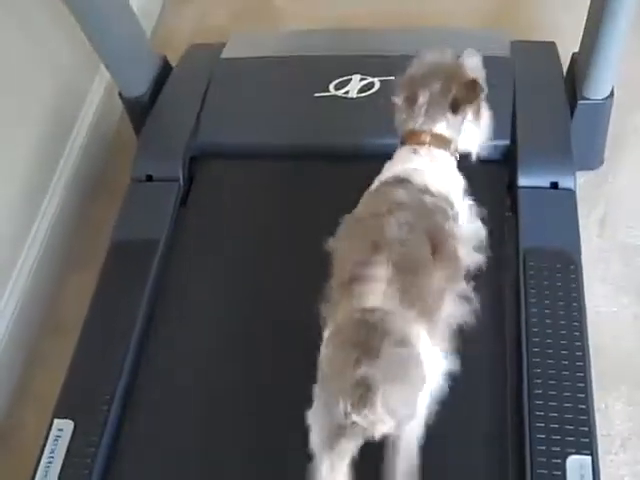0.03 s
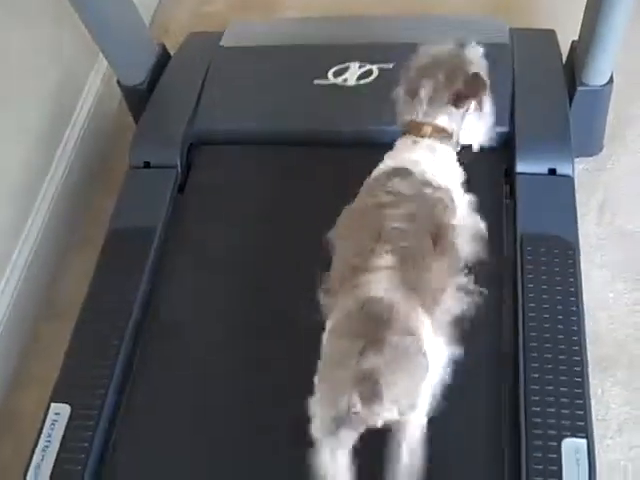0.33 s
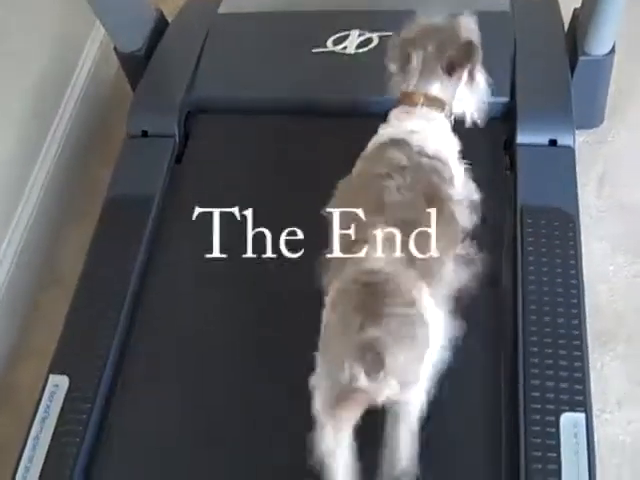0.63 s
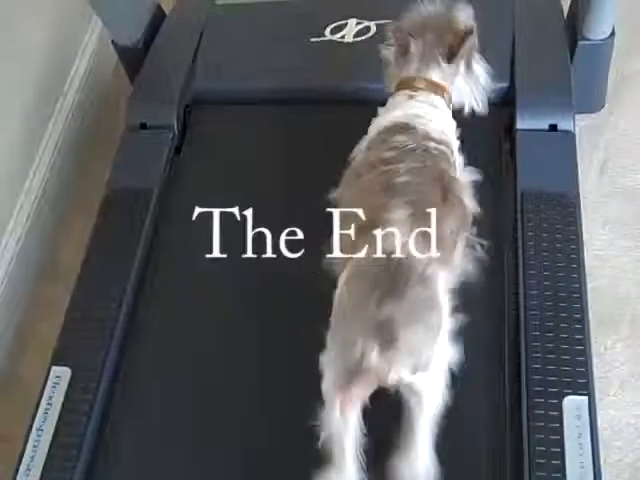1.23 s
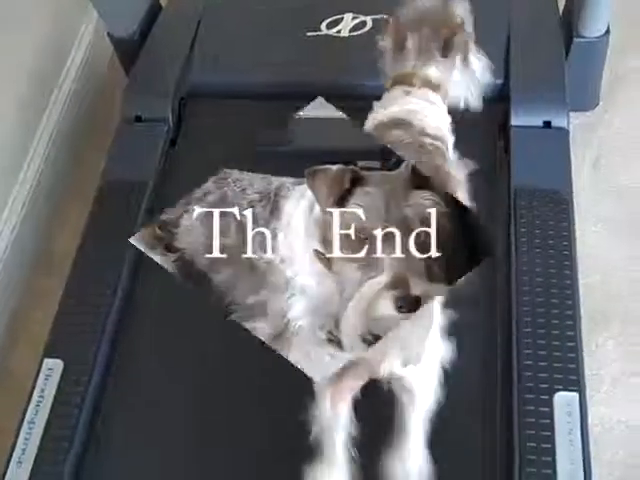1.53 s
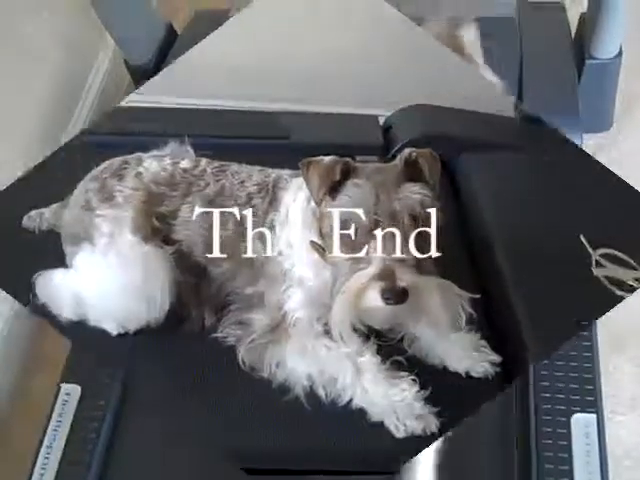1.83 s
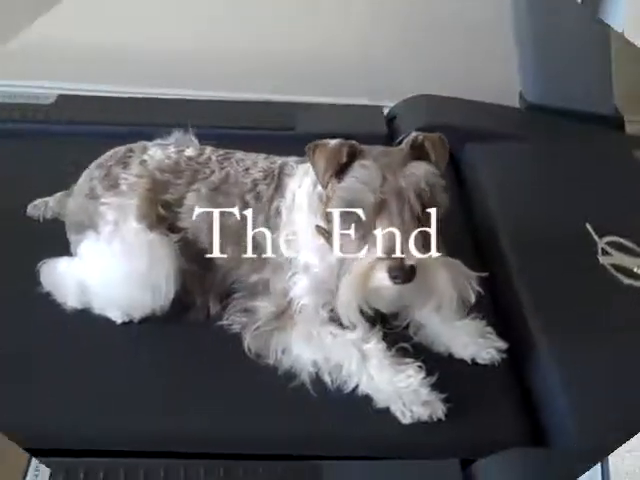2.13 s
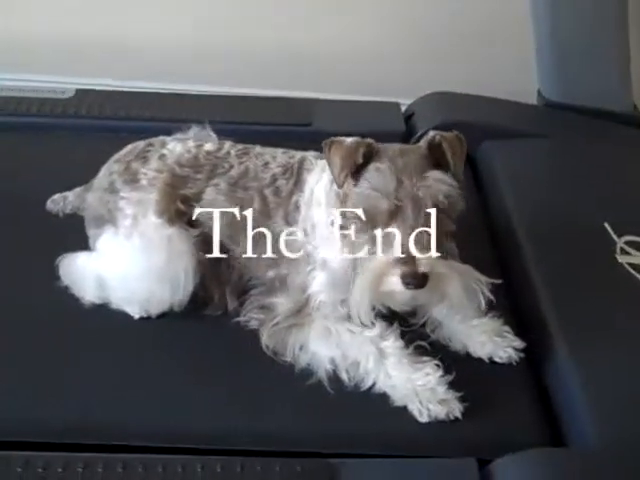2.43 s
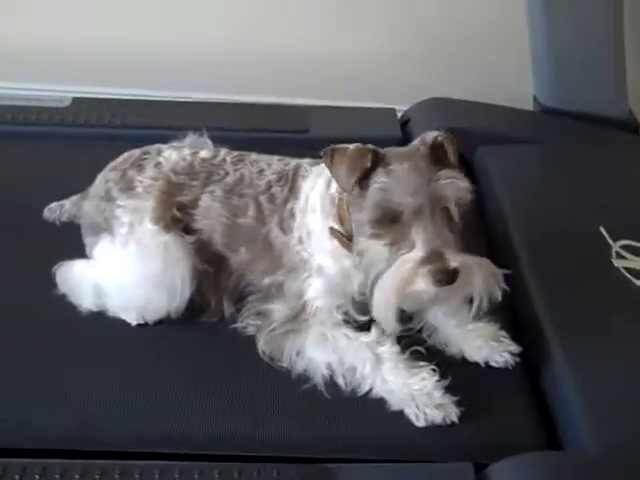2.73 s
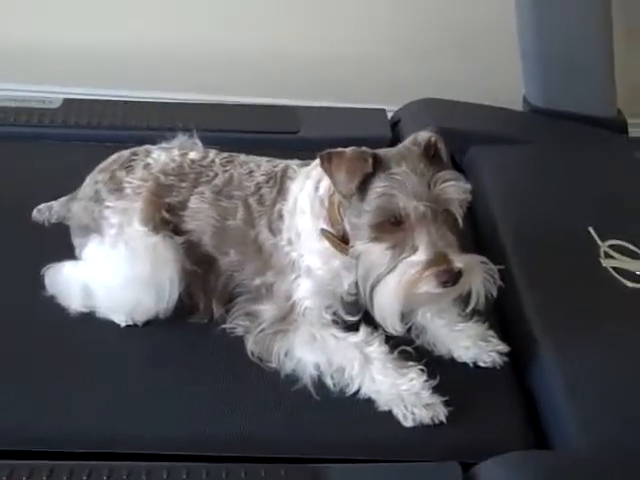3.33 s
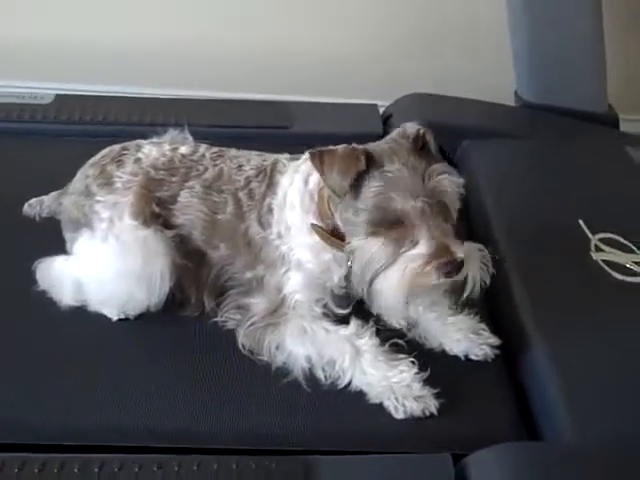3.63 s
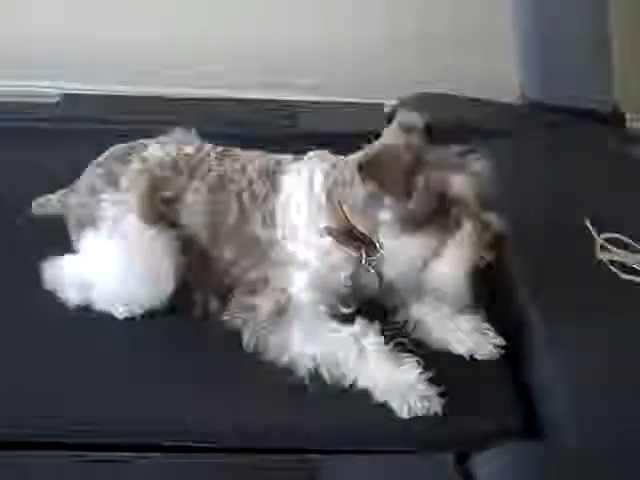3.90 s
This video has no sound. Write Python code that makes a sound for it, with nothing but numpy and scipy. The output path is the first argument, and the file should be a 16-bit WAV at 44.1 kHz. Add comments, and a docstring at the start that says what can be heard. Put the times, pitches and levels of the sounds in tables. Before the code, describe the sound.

A small dog trots on a running treadmill, claws clicking and tags jingling, then quiet.

```python
"""A small dog trots on a running treadmill, close to the microphone in a small room.
Its claws clack on the deck (the hollow board under the belt), its pads scuff the belt, and two
metal collar tags knock and ring. Behind the dog, the motor hums and the belt rumbles.
The scene then cuts to a quiet room with a faint high whine and one soft tap,
where the resting dog stirs and a tag ticks once."""
import sys
import numpy as np
from scipy import signal
from scipy.fft import rfft, irfft
from scipy.io import wavfile
from scipy.ndimage import uniform_filter1d

SR = 44100
rng = np.random.default_rng(int(sys.argv[2]) if len(sys.argv) > 2 else 0)


def waveform_to_disk(signal):
    """Save audio, clipped to [-1, 1], as 16-bit WAV at the path in sys.argv[1]."""
    frames = np.transpose(np.atleast_2d(signal))
    scaled = np.clip(frames, -1, 1) * 32767
    samples = np.round(scaled).astype(np.int16)
    wavfile.write(sys.argv[1], SR, samples)


N = 176400

# How alike left and right sound (1 the same, 0 unrelated, -1 opposite): pitch_hz, likeness
LIKENESS = [(600, .96), (1500, .84), (3500, .64), (5200, .3), (7800, -.3), (12000, 0)]
QUIET_LIKENESS = [(100, 0.8), (370, 0.2), (1200, 0)]
# How much louder the left side is than the right: pitch_hz, left_minus_right_db
MIC_BALANCE = [(30, -6.5), (60, -4), (200, -2.5), (1200, -1), (4000, -1.5), (5400, -3), (6400, -7),
               (7000, 0), (7700, 11.5), (9200, 12), (14000, 7)]
QUIET_BALANCE = [(110, -5), (370, 8), (1100, 6.5), (3800, .5), (7700, 2.5), (14000, -2)]
# Tone of the quiet room's air, the soft tap and the moving belt: pitch_hz, level_db
AIR_TONE = [(15, -14.5), (35, -3.5), (75, -0.5), (130, -3), (175, -6.5), (240, -2.5), (300, -9), (420, -9),
            (750, -13), (2000, -18), (7500, -23), (14000, -28)]
TAP_TONE = [(400, -20), (1000, 0), (2000, -16.5), (6000, -35)]
BELT_TONE = [(25, -21), (55, -6), (95, -13.5), (125, 0.5), (160, 1), (210, -3.5), (260, -3.5), (370, -14),
             (650, -12), (900, -11.5), (1250, -16), (1700, -16.5), (3400, -13.5), (5000, -10), (6600, -8.5),
             (8600, -10.5), (10000, -21), (14000, -32)]
# Steady notes of the quiet room and of the motor: pitch_hz, level_db
QUIET_NOTES = [(119, -68.5), (241, -73.5), (7865, -77.5)]
MOTOR_NOTES = [(185.6, -36.5), (592, -55.5), (786.5, -46), (1394, -53), (1574, -53.5), (1992, -54),
               (3398, -48.5)]
# Loudness over time of the belt and of the collar's chatter: time_s, level_db
BELT_LEVEL = [(0, -30), (.6, -28), (1.35, -29), (2.05, -32), (2.3, -28.5)]
CHATTER_LEVEL = [(0, -35.5), (.2, -33), (.6, -29), (1.9, -32.5), (2.3, -30)]
# Notes each tag rings at (fade_s is the time to drop 60 dB): pitch_hz, level_db, fade_s
FIRST_TAG = [(9218, -.7, .18), (9165, -12, .1), (9285, -14, .08), (11321, -20, .26), (5087, -20, .4)]
SECOND_TAG = [(10787, -1, .14), (11321, -12, .16), (4527, -3, .15)]
# Pitches at which the collar's ring and buckle sound strongly: pitch_hz, width_hz, level_db
BUCKLE_PEAKS = [(7324, 70, -6), (7920, 110, 1), (8425, 70, -2), (4527, 40, -4), (5087, 30, -5),
                (9216, 70, -5), (10787, 60, -16), (11321, 50, -22)]
# Tone of the tags rattling on their ring: pitch_hz, level_db
RATTLE_TONE = [(1000, -30), (4000, -13.5), (4700, -4.5), (6500, -5.5), (7800, 1.5), (9100, -7),
               (10000, -20.5), (14000, -22)]
# Each shake of the collar: start_s, rise_s, first_tag_db, second_tag_db, rattle_db
JINGLES = [(0.012, 0.0058, -16, -51, -59), (.040, 0.014, -20.5, -42, -49), (0.117, 0.0018, -36.5, -50, -23),
           (.220, 0.0028, -16, -36.5, -30.5), (.244, 0.0038, -20.5, -45.5, -31),
           (.640, 0.019, -21, -34, -25), (.811, 0.0027, -19, -17, -14.5), (.842, 0.0059, -16, -48, -40),
           (.937, 0.0053, -22.5, -48.5, -30), (.998, 0.0071, -22.5, -35, -19),
           (1.099, 0.0015, -21.5, -27, -16), (1.387, 0.0083, -21, -17, -14),
           (1.455, .008, -16.5, -58, -42.5), (1.527, 0.0097, -16.5, -46, -22),
           (1.553, 0.012, -24, -22.5, -24.5), (1.645, 0.019, -14.5, -44, -39),
           (1.676, 0.0032, -16, -42, -20.5), (1.801, .006, -27.5, -36, -17.5),
           (1.826, 0.035, -37.5, -30.5, -46), (1.979, 0.001, -13.5, -27.5, -14.5),
           (2.099, 0.017, -15.5, -33.5, -22), (2.268, 0.0018, -29, -40, -15)]
# Tone of a claw's clack, a pad's scuff and the deck's thud: pitch_hz, level_db
CLAW_TONE = [(100, -24), (400, -19.5), (800, -11), (1300, -7.5), (1850, -1.5), (2700, -4.5), (3400, 0.5),
             (4800, -3), (6500, 2), (8000, -5), (9500, -19), (14000, -31)]
SCUFF_TONE = [(100, -15.5), (500, -18.5), (900, -0.5), (1400, -1.5), (2200, 1.5), (3500, -1.5), (5000, -3),
              (7800, 1.5), (9800, -23.5), (14000, -27.5)]
THUD_TONE = [(60, -22), (150, 4), (300, -10.5), (700, -23.5), (2000, -42.5)]
# Claws catching the belt: start_s, level_db
CLAW_TICKS = [(0.349, -15.5), (0.4107, -15), (0.6452, -12.5), (.997, -13), (1.003, -15), (1.232, -14),
              (1.520, -15.5), (1.57, -19.5), (1.815, -16), (2.103, -14), (2.162, -20)]
# Each paw landing: start_s, claw_db, pad_db, brightness_db_per_octave, knock_pitch_hz
STEPS = [(.056, -18.5, -24, -2, 2217), (.160, -9, -20.5, 0.5, 3930), (.255, -13, -19.5, 0, 3440),
         (0.355, -16.5, -17, 1, 4120), (.449, -9.5, -16.5, 1.5, 2000), (.548, -9.5, -21, -1, 3402),
         (.653, -16, -16.5, 1.5, 3140), (0.7415, -8.5, -19.5, 1.5, 3310), (.8328, -14, -23, 0, 3260),
         (.931, -21.5, -18.5, -5.5, 1900), (1.030, -8.5, -26.5, 0, 1860), (1.1205, -10.5, -23, 0.5, 3340),
         (1.22, -17.5, -18.5, -2, 3430), (1.3156, -6.5, -18, 0, 2000), (1.407, -14, -24, -1.5, 3600),
         (1.505, -21.5, -19.5, -3, 4198), (1.6044, -9, -21.5, 0.5, 2000), (1.700, -13, -23, 0, 3300),
         (1.803, -21, -16.5, 0.5, 2411), (1.9008, -8.5, -17.5, 1.5, 2180), (1.995, -19, -29, -1.5, 3400),
         (2.094, -18, -26.5, -2, 2320), (2.1934, -11.5, -20.5, 1.5, 3200), (2.286, -14, -21.5, 5, 3600)]

CUT_S, CUT_FADE_S = 2.304, 0.0096
ECHO_DELAY_S, ECHO_FADE_S, ECHO_DB = 0.0025, 0.26, -7.5
TAG_ROUGHNESS, TAG_TOUCHES_PER_S = 0.589, 170
COLLAR_DB, CHATTER_FLUTTER_DB = 0.66, 2.6
CLAW_GAP_S, CLAW_DECAY_S, CLAW_SCATTER_DB = 0.0012, 0.0007, 1.5
KNOCK_DB, KNOCK_DECAY_S = -16, 0.0011
THUD_DB, THUD_DB_PER_CLAW_DB = -29, 0.68


def amp(db):
    """Turn decibels into a number to multiply by."""
    return 10 ** (np.asarray(db) / 20)


def unit(x):
    """Scale a signal to an average power of 1."""
    return x / np.sqrt(np.mean(x ** 2))


def curve(points):
    """Read a table's value at every pitch in the sound."""
    hz, value = np.array(points, float).T
    return np.interp(np.log(np.fft.rfftfreq(N, 1 / SR) + 1e-9), np.log(hz), value)


def colour(x, tone):
    """Give a sound the tone in a table; plain noise keeps its power."""
    return irfft(rfft(x) * unit(amp(curve(tone))), N)


def spread(pair, likeness=LIKENESS):
    """Turn two signals into left and right, alike in the bass."""
    alike = np.clip(curve(likeness), -1, 1)
    shared, different = rfft(pair) * np.sqrt([(1 + alike) / 2, (1 - alike) / 2])
    return irfft(np.array([shared + different, shared - different]), N)


def lean(x, balance):
    """Left and right pick up each pitch with different strength."""
    half_db = curve(balance) / 2
    return irfft(rfft(x) * amp([half_db, -half_db]), N)


def wander(per_s):
    """A smooth random wobble, about 1 in size."""
    hold = max(int(SR / per_s), 1)
    stairs = np.repeat(rng.standard_normal(N // hold + 1), hold)
    return unit(uniform_filter1d(uniform_filter1d(stairs, hold), hold)[:N])


def noise():
    """Two unrelated, even hisses (white noise)."""
    return rng.standard_normal((2, N))


def add(out, start_s, sound):
    """Mix a sound in at a given time."""
    i = max(int(start_s * SR), 0)
    out[..., i:i + sound.shape[-1]] += sound[..., :max(N - i, 0)]


def strike(rise_s, decay_s):
    """The loudness of a hit: it climbs steadily, then dies away."""
    t = np.arange(SR // 4) / SR
    return np.minimum(t / rise_s, 1) * np.exp(-np.maximum(t - rise_s, 0) / decay_s)


def swell(levels):
    """Turn a table of times and levels into a volume curve."""
    return amp(np.interp(np.arange(N) / SR, *np.array(levels).T))


def hum(notes, drift, flutter_db):
    """Steady notes that waver a little in pitch and loudness."""
    clock = np.cumsum(1 + drift * wander(11)) / SR
    out = 0
    for hz, db in notes:
        level = amp(db + flutter_db * wander(20)) * np.sqrt(2)
        out += level * np.sin(2 * np.pi * (hz * clock + rng.random()))
    return out


def quiet_room():
    """Hiss, electric hum and a thin whine; a faint soft tap, then one light tick of a tag."""
    tick, tap, ring = np.zeros(N), np.zeros(N), np.zeros((2, N))
    tap_s, tick_s = 2.893, 3.944
    add(tap, tap_s, amp(-58) * strike(rise_s=0.0022, decay_s=0.0082))
    add(tick, tick_s, amp(-48) * strike(rise_s=0.00088, decay_s=0.0026))
    add(ring, tick_s, amp(-53) * tag(FIRST_TAG, rise_s=0.00083))
    air = spread(colour(noise(), AIR_TONE), QUIET_LIKENESS)
    steady = amp(-58) * lean(air, QUIET_BALANCE) + hum(QUIET_NOTES, drift=0.00081, flutter_db=0.4)
    tag_tick = lean(ring + colour(noise() * tick, RATTLE_TONE), MIC_BALANCE)
    return steady + tag_tick + spread(colour(noise() * tap, TAP_TONE))


def room_echo(x):
    """Nearby walls bounce the sound back as a short tail."""
    t = np.arange(N) / SR
    fade = (t > ECHO_DELAY_S) * amp(-60 * t / ECHO_FADE_S)
    tail = spread(noise() * fade)[:, :SR // 2]
    tail /= np.sqrt(np.sum(tail ** 2) / 2)
    return x + amp(ECHO_DB) * signal.fftconvolve(x[:1], tail, axes=1)[:, :N]


def treadmill():
    """The motor hums; the belt rumbles over the rollers and hisses on the deck."""
    belt = spread(colour(noise() * amp(2 * wander(40.07)), BELT_TONE))  # flutters by about 2 dB
    return swell(BELT_LEVEL) * belt + hum(MOTOR_NOTES, drift=0.006, flutter_db=2.4)


def tag(notes, rise_s):
    """A struck metal tag rings at several pitches; light touches keep disturbing each one."""
    t = np.arange(SR // 4) / SR
    touch_times = np.arange(100) / TAG_TOUCHES_PER_S
    out = 0
    for hz, db, fade_s in notes:
        # Complex numbers let a touch nudge both the size and the timing of the wave.
        nudges = rng.standard_normal(100) + 1j * rng.standard_normal(100)
        jostle = 1 + TAG_ROUGHNESS * np.interp(t, touch_times, nudges)
        cycles = hz * t + rng.random() + np.array([[0], [3 / 8]])  # the right side runs ahead
        wave = np.imag(jostle * np.exp(2j * np.pi * cycles))
        out += amp(db) * strike(rise_s, fade_s / np.log(1000)) * wave
    return out


def collar():
    """The tags knock and jingle with the stride; the ring and buckle chatter all the while."""
    tags, shake = np.zeros((2, N)), np.zeros(N)
    for start_s, rise_s, first_db, second_db, rattle_db in JINGLES:
        add(tags, start_s, amp(first_db) * tag(FIRST_TAG, rise_s))
        add(tags, start_s, amp(second_db) * tag(SECOND_TAG, rise_s))
        add(shake, start_s, amp(rattle_db) * strike(rise_s, decay_s=0.014))
    grain = unit(np.exp(0.28 * wander(900)))
    rattle = colour(noise() * shake * grain, RATTLE_TONE)
    pitches = np.fft.rfftfreq(N, 1 / SR)
    metal = sum(amp(db) / (1 + (2 * (pitches - hz) / width) ** 2) for hz, width, db in BUCKLE_PEAKS)
    flutter = amp(CHATTER_FLUTTER_DB * (0.5 * wander(25) + wander(300)))
    chatter = unit(irfft(rfft(noise() * flutter) * metal, N))
    return tags + spread(rattle + swell(CHATTER_LEVEL) * chatter)


def deck_knock(crack, hz):
    """The claws briefly ring the hollow deck; the pitch depends on where the paw lands."""
    t = np.arange(len(crack)) / SR
    ring = np.exp(-t / KNOCK_DECAY_S) * np.sin(2 * np.pi * hz * t)
    return unit(signal.fftconvolve(crack, ring)[:len(crack)])


def brighten(x, db_per_octave, pivot_hz=4000):
    """Make a short sound brighter, or duller if the amount is negative."""
    octaves = np.log2(np.maximum(np.fft.rfftfreq(x.shape[-1], 1 / SR), 500) / pivot_hz)
    delayed = np.roll(x, 20, axis=-1)  # leaves space for the filter to smear the start
    return irfft(rfft(delayed) * amp(db_per_octave * octaves))


def claw_clack(count, samples=1024):
    """Claws land one after another, each a tiny crack of noise."""
    t = np.arange(samples) / SR
    loudness = np.zeros(samples)
    for claw in range(count):
        since = t - CLAW_GAP_S * (claw + rng.uniform(0, 0.44))
        strength = amp(CLAW_SCATTER_DB * rng.standard_normal())
        loudness += strength * (since > 0) * np.exp(-abs(since) / CLAW_DECAY_S)
    crack = loudness * np.sign(rng.standard_normal((2, samples)))
    return unit(crack) * np.sqrt(count * CLAW_GAP_S * SR / samples)


def paws():
    """Four claws clack and knock on the deck, the pad scuffs the belt, and harder steps thud more."""
    t = np.arange(N) / SR
    claws, knocks, rub, weight = np.zeros((2, N)), np.zeros((2, N)), np.zeros(N), np.zeros(N)
    scuff_rise_s, scuff_fall_s = 0.0089, 0.011
    for start_s, claw_db, pad_db, brightness, knock_hz in STEPS:
        crack = claw_clack(count=4)
        add(claws, start_s, amp(claw_db) * brighten(crack, brightness))
        add(knocks, start_s, amp(claw_db + KNOCK_DB) * deck_knock(crack[0], knock_hz))
        thud_db = THUD_DB + THUD_DB_PER_CLAW_DB * claw_db
        add(weight, start_s, amp(thud_db) * strike(rise_s=0.0083, decay_s=0.036))
        since = t - start_s
        rub += amp(pad_db) * np.exp(-np.maximum(-since / scuff_rise_s, since / scuff_fall_s))
    for start_s, db in CLAW_TICKS:
        add(claws, start_s, amp(db) * claw_clack(count=2))
    grain = unit(np.exp(0.5 * wander(1500)))
    scuffs = colour(noise() * rub * grain, SCUFF_TONE)
    thuds = colour(noise() * weight, THUD_TONE)
    return knocks + spread(colour(claws, CLAW_TONE) + scuffs + thuds)


def scene():
    """The trot, then a quick cut to the quiet room."""
    trot = room_echo(paws()) + amp(COLLAR_DB) * collar() + treadmill()
    before_cut = np.clip((CUT_S - np.arange(N) / SR) / CUT_FADE_S + 1, 0, 1)
    return before_cut * lean(trot, MIC_BALANCE) + (1 - before_cut) * quiet_room()


def record(dry):
    """The sharpest clacks overload, and the treble above 14400 Hz is cut."""
    treble_cut = signal.ellip(10, 0.2, 80, 14400, fs=SR, output="sos")
    return signal.sosfilt(treble_cut, np.clip(dry, -0.95, 0.95))


dry = scene()
out = record(dry)
waveform_to_disk(out)
```